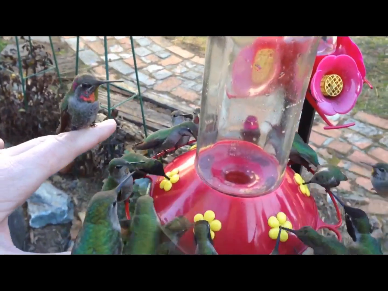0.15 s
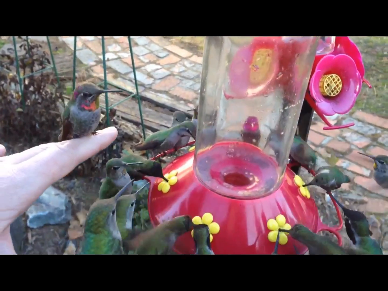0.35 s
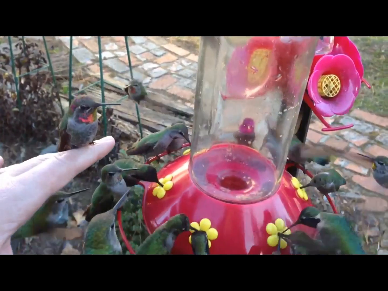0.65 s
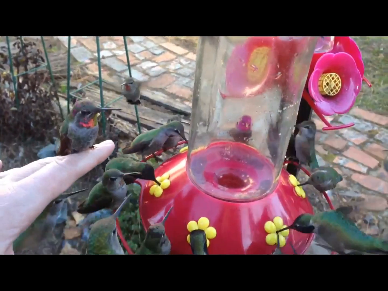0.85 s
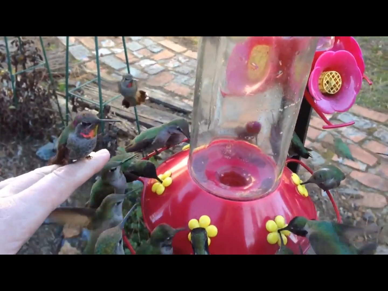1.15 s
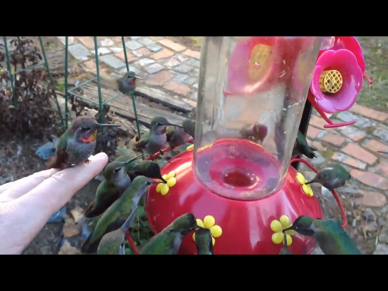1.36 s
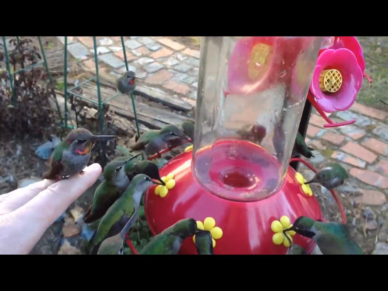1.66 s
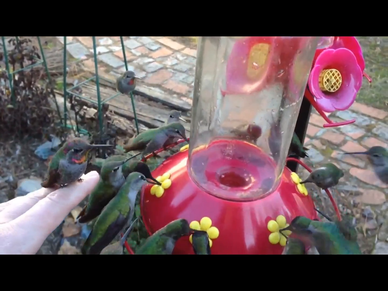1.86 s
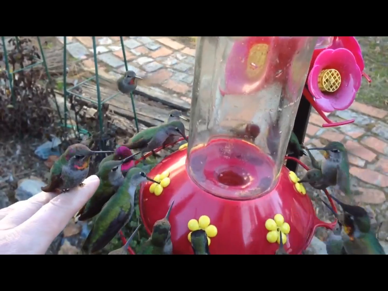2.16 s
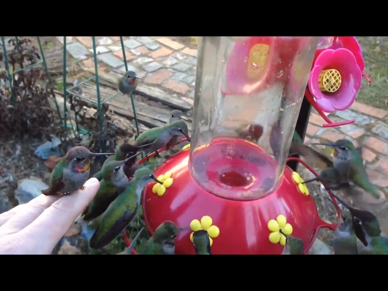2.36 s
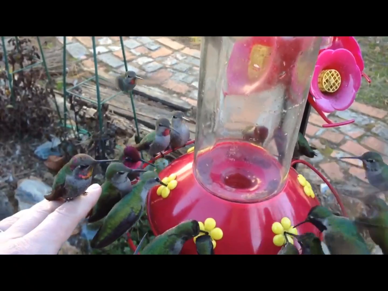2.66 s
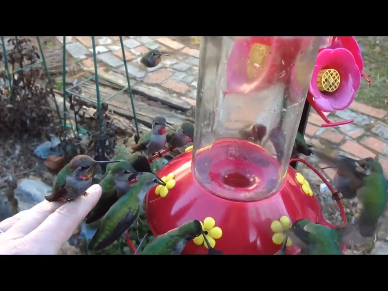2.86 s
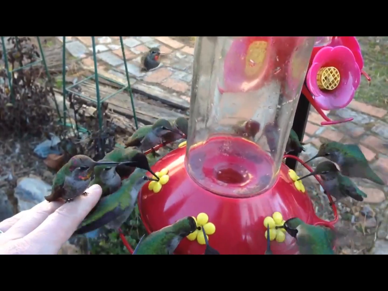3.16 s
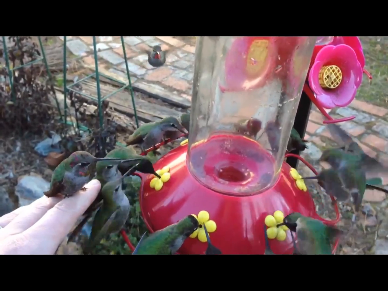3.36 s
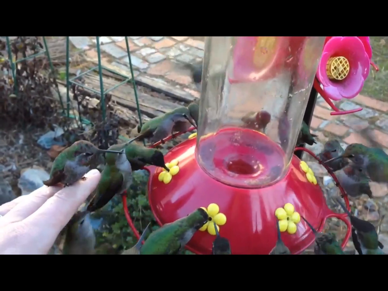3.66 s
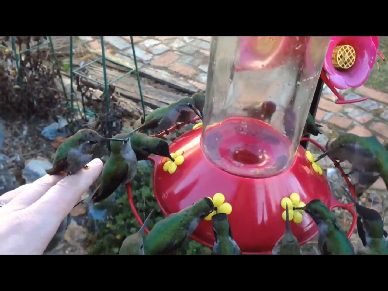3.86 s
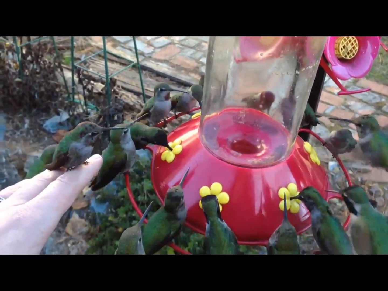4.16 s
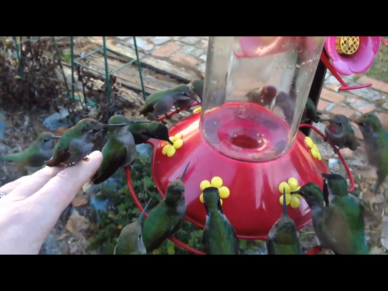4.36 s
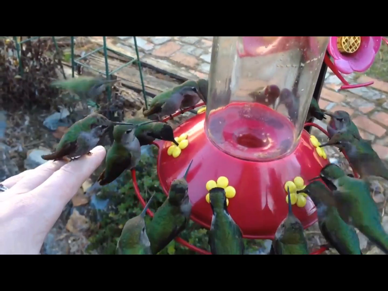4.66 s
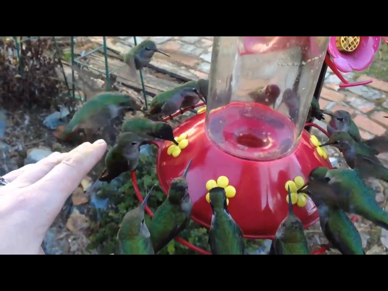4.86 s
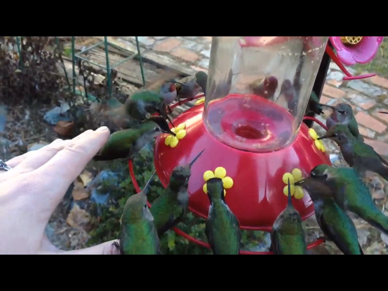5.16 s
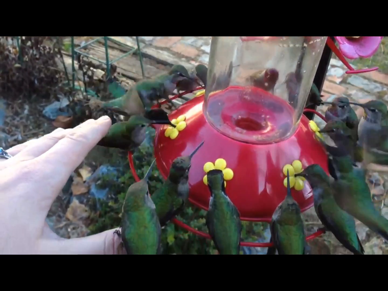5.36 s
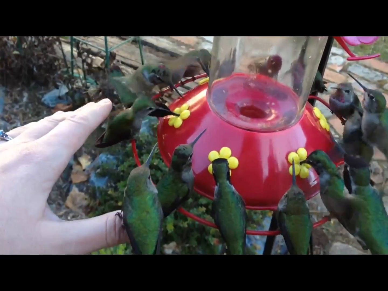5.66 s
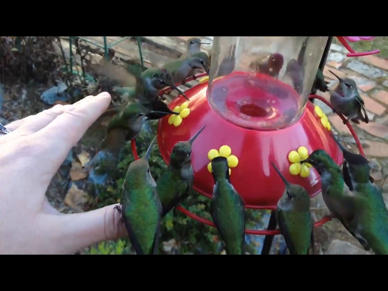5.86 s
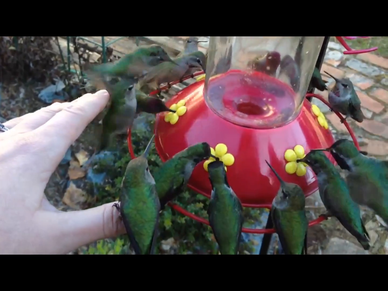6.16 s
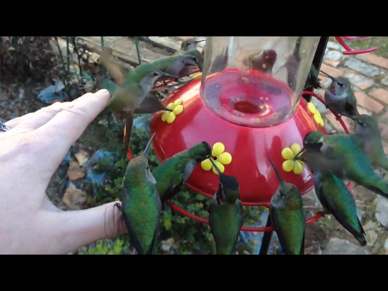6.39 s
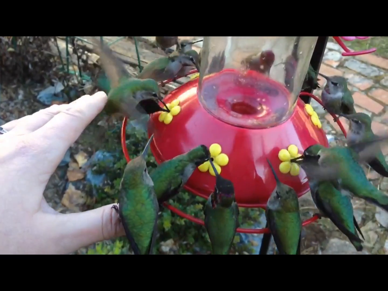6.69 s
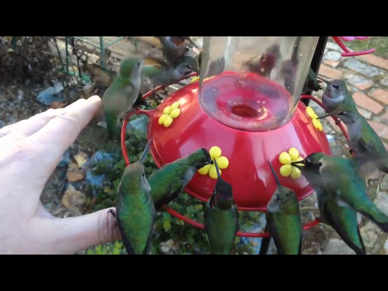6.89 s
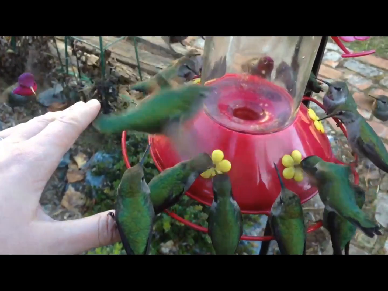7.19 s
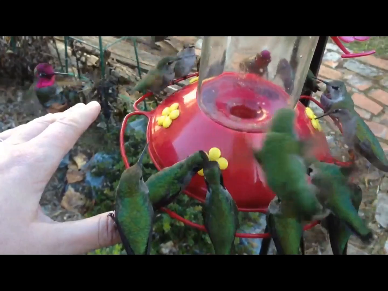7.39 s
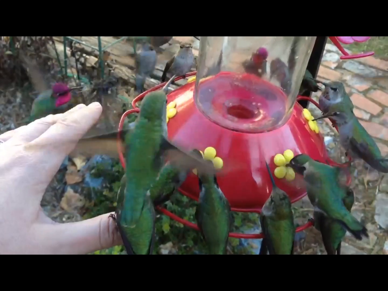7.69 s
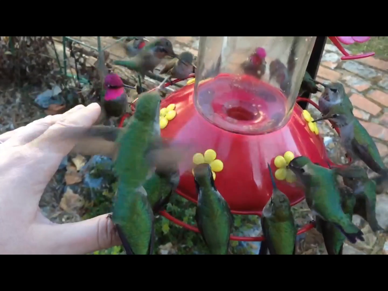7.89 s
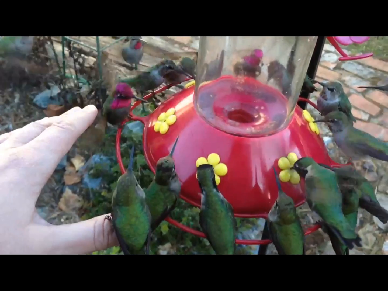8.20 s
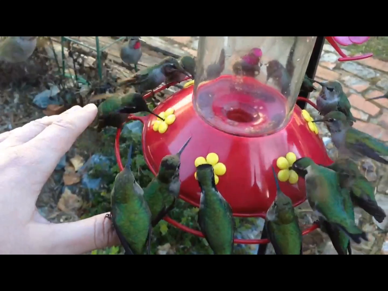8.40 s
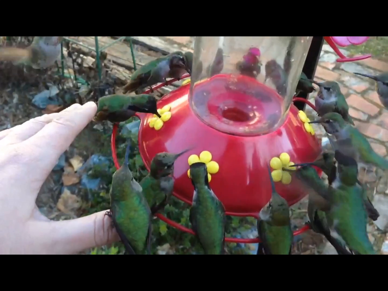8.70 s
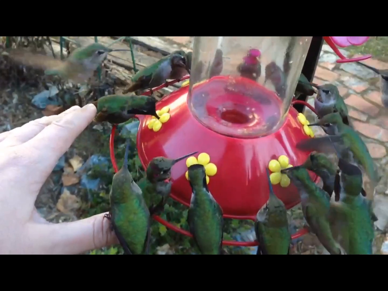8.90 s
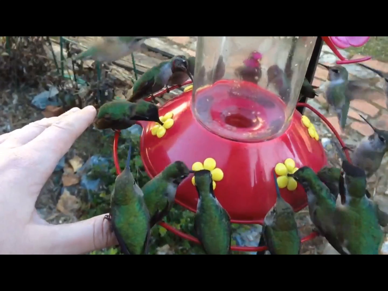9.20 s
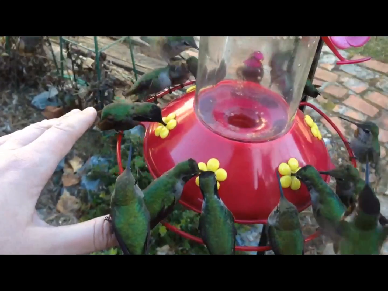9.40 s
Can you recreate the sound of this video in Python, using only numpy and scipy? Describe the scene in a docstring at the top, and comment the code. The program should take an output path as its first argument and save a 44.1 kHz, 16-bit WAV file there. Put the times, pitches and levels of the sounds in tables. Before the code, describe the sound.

A swelling low hum of many hummingbird wings, with feathery swishes, sharp little wing slaps and high squeaky chips outdoors.

```python
"""Hummingbirds hover round a garden feeder, an arm's length from a small microphone. From the start,
over outdoor hiss, wings beat near 50 times a second and hum on its multiples; feathers swish on each
beat and now and then slap. Quick falling chips join at 1.4 s. Around 3 s the birds jostle close by and
one squeaks a thin whistle. The hum swells highest at 7.4 s; raspy scolding and peeps follow, then a
wavering whine from 8.4 s and a few last chips."""
import sys
import numpy as np
from scipy import signal
from scipy.fft import rfft, irfft
from scipy.io import wavfile
from scipy.ndimage import uniform_filter1d

SR = 44100
rng = np.random.default_rng(int(sys.argv[2]) if len(sys.argv) > 2 else 0)


def master(y):
    """Save y as 16-bit WAV."""
    cut = np.clip(np.atleast_2d(y).T, -1, 1)
    pcm = np.round(cut * 32767)  # scale
    wavfile.write(sys.argv[1], SR, pcm.astype(np.int16))


N = 420713
COARSE = 8  # the hum is all bass, so it is built on every 8th sample


def undb(db):
    """Decibels to gain."""
    return 10 ** (np.asarray(db) / 20)


def unit(x):
    """Scales x to rms 1."""
    return x / np.sqrt(np.mean(x ** 2))


def equalise(x, curve):
    """Shapes x with an EQ curve of (f/Hz, gain/dB) points."""
    hz, db = np.transpose(curve)
    f = np.maximum(np.arange(N // 2 + 1) * SR / N, 1)
    return irfft(rfft(x) * undb(np.interp(np.log(f), np.log(hz), db)), N)


def drift(rate, size=N // COARSE + 1):
    """A random modulator of rms 1 across the scene: ramps between rate points a second."""
    knots = rng.standard_normal(int(N / SR * rate) + 2)
    return unit(np.interp(np.linspace(0, N / SR * rate, num=size), np.arange(len(knots)), knots))


def add(out, s, x):
    """Mixes x into out from time s."""
    i = int(s * SR)
    out[i:i + len(x)] += x[:N - i]


def humps(rows):
    """An envelope with a raised-cosine hump for each (middle/s, width at half height/s, height)."""
    out = np.zeros(N)
    for s, width, height in rows:
        angle = np.linspace(0, np.pi, int(2 * width * SR))
        cut = max(int((width - s) * SR), 0)
        add(out, max(s - width, 0), height * np.sin(angle[cut:]) ** 2)
    return out


# EQ of the outdoor bed: f/Hz, gain/dB
AIR_EQ = [(30, 10), (100, 34), (300, 3.5), (600, 4.5), (1000, 4), (3000, -1.5), (8000, -1), (15000, -0.5)]


def outdoor_air(level_db=-53, drift_db=.6):
    """A bed of hiss and low rumble whose level drifts slightly."""
    bed = unit(equalise(rng.standard_normal(N), AIR_EQ))
    return bed * undb(level_db) * undb(drift_db * drift(4, N))


# scolding cues: t/s, length/s, centre f/Hz, bandwidth/Hz, level/dB
RASPS = [(5.593, .1, 8000, 1200, -61), (8.016, 0.042, 8550, 2500, -57), (8.048, 0.028, 6000, 4000, -59),
         (8.146, 0.048, 8600, 3000, -54.5), (8.15, 0.049, 5450, 2005, -53)]


def rasps(flutter_hz=190):
    """Raspy scolding: bands of noise chopped by a fast throat flutter."""
    out = np.zeros(N)
    for s, length, hz, width_hz, db in RASPS:
        t = np.arange(0, length, 1 / SR)
        peak = signal.iirpeak(hz, hz / width_hz, fs=SR)
        band = signal.lfilter(*peak, signal.lfilter(*peak, rng.standard_normal(len(t))))
        flutter = 1 + .4 * np.sin(2 * np.pi * flutter_hz * t)
        add(out, s, undb(db) * unit(band * flutter) * signal.windows.tukey(len(t), .4))
    return out


def whistle(contours, wobble, grit):
    """Near-sine voices, shaky in pitch and level, from (t/s, f/Hz, level/dB[, octave/dB]) points."""
    out = np.zeros(N)
    for contour in contours:
        s, hz, *levels = np.transpose(contour)
        t = np.arange(s[0], s[-1], 1 / SR)
        shake, rough = uniform_filter1d(rng.standard_normal((2, len(t))), size=120) * np.sqrt(120)
        phase = 2 * np.pi * np.cumsum(np.interp(t, s, hz) * (1 + wobble * shake)) / SR
        voice = sum(np.interp(t, s, undb(db)) * np.sin(k * phase) for k, db in enumerate(levels, 1))
        add(out, s[0], np.sqrt(2) * voice * (1 + grit * rough) * signal.windows.tukey(len(t), .1))
    return out


# whine breakpoints, one list a phrase: t/s, f/Hz, level/dB
WHINE_PHRASES = [
    [(8.4, 4630, -51), (8.42, 5116, -57), (8.446, 5110, -56), (8.5, 4720, -55.5), (8.6, 4665, -53.5),
     (8.615, 4648, -64)],
    [(8.625, 4250, -53), (8.68, 4440, -54), (8.725, 4600, -58)],
    [(8.74, 4665, -54), (8.82, 4900, -62), (8.85, 4340, -55)],
]


def whine(octave_db=-9):
    """A long, grainy, wavering call that breaks twice."""
    contours = [[(s, hz, db, db + octave_db) for s, hz, db in phrase] for phrase in WHINE_PHRASES]
    return whistle(contours, wobble=.012, grit=.3)


# peep cues: t/s, length/s, start f/Hz, end f/Hz, top level/dB
PEEPS = [(4.409, 0.024, 11510, 11240, -47), (4.458, 0.022, 9150, 9500, -47), (5.6, 0.061, 7400, 7300, -65),
         (7.159, 0.058, 9300, 9500, -51), (7.996, .029, 9550, 8750, -50), (8.044, 0.035, 8400, 9280, -46),
         (8.135, .013, 9440, 9100, -48), (9, .07, 4696, 5840, -62), (9.294, 0.036, 4596, 4340, -50.5)]


def peeps():
    """Short grainy glides, loudest a third of the way in."""
    contours = [[(s, start_hz, db - 8),
                 (s + .32 * length, start_hz + .37 * (end_hz - start_hz), db),
                 (s + length, end_hz, db - 9)] for s, length, start_hz, end_hz, db in PEEPS]
    return whistle(contours, wobble=.012, grit=.3)


# squeak cues: t/s, length/s, start f/Hz, top f/Hz, climb/s, level/dB, octave level/dB
SQUEAKS = [(3.078, 0.093, 7340, 7667, 0.013, -38, -53), (6.832, 0.094, 7336, 7660, 0.035, -43, -51),
           (7.858, 0.081, 7010, 7520, 0.042, -38, -58)]


def squeaks(sag_hz_per_s=2800, fade_db=4.5):
    """Thin, clean whistles that climb, then sag and fade."""
    contours = []
    for s, length, start_hz, top_hz, climb, db, octave_db in SQUEAKS:
        sag_hz = top_hz - sag_hz_per_s * (.82 * length - climb)
        end_hz = top_hz - sag_hz_per_s * (length - climb) - 350
        contours.append([(s, start_hz, db - fade_db, octave_db - fade_db),
                         (s + climb, top_hz, db, octave_db),
                         (s + .83 * length, sag_hz, db - fade_db, octave_db - fade_db),
                         (s + length, end_hz, db - 16, octave_db - 22)])
    return whistle(contours, wobble=.003, grit=.08)


# chip cues: t/s, top f/Hz, bottom f/Hz, length/s, peak level/dB
CHIPS = [(1.444, 7840, 2300, 0.0081, -43), (1.622, 8740, 5500, 0.0075, -51.5),
         (1.726, 4280, 2750, 0.0025, -46), (1.955, 10500, 3800, .013, -55.5), (2.73, 8000, 5500, .005, -55),
         (3.822, 9500, 5770, 0.0054, -41), (4.191, 7976, 2440, 0.0057, -41.5),
         (4.737, 8610, 3000, 0.0059, -50), (4.75, 7780, 2560, 0.0088, -40),
         (5.189, 8500, 2460, 0.0059, -46), (5.434, 9600, 3326, 0.01, -46),
         (5.678, 7140, 5000, 0.0027, -40.5), (7.769, 8500, 4500, 0.0076, -40.5),
         (7.845, 7060, 4000, .005, -47), (8.145, 9100, 5300, 0.0074, -44), (8.164, 6970, 2200, 0.012, -35),
         (8.85, 4600, 3170, 0.0046, -37.5), (9.069, 5300, 2100, 0.021, -44.5),
         (9.325, 4350, 2800, 0.0071, -38)]


def chips(bend=1.8):
    """Each chip is a sine that plunges within milliseconds."""
    out = np.zeros(N)
    for s, top_hz, low_hz, length, db in CHIPS:
        progress = np.linspace(0, 1, int(length * SR))
        hz = top_hz + (low_hz - top_hz) * progress ** bend
        envelope = np.sin(np.pi * progress ** 1.33)
        add(out, s, undb(db) * envelope * np.sin(2 * np.pi * np.cumsum(hz) / SR))
    return out


def wing_hits(cues, ring_q, attack_s=.00029, crack_s=.00035, tail_db=-17, tail_s=.003):
    """A blow and a tight crack with a rustling tail, voiced as a broad ring plus a treble snap."""
    out, t = np.zeros(N), np.arange(900) / SR
    treble_band = signal.butter(1, (6000, 13500), "band", fs=SR)
    attack = 1 - np.exp(-t / attack_s)
    envelope = attack * (np.exp(-t / crack_s) + undb(tail_db) * np.exp(-t / tail_s))
    blow = .48 * np.exp(-((t - .0005) / .00006) ** 2)
    for s, ring_db, hz, snap_db in cues:
        ring_burst, snap_burst = rng.standard_normal((2, len(t))) * envelope
        ring = signal.lfilter(*signal.iirpeak(hz, ring_q, fs=SR), ring_burst + blow)
        snap = signal.lfilter(*treble_band, snap_burst)
        hit = undb(ring_db) * ring / abs(ring).max() + undb(snap_db) * snap / abs(snap).max()
        add(out, s + .0003, hit)
    return out


# runs of soft touches: first t/s, last t/s, ring peak level/dB, ring f/Hz, snap peak level/dB
BRUSHES = [(2.039, 2.136, -44.5, 1720, -45), (2.866, 2.981, -39, 1400, -40),
           (3.1457, 3.396, -43.5, 1880, -63), (5.443, 5.5136, -40.5, 1180, -45),
           (6.151, 6.2328, -41.5, 2698, -38.5), (6.8318, 6.861, -38, 1398, -37),
           (7.564, 7.623, -43, 1200, -42)]


def brushes(gap_s=.019, scatter_db=2.5, pitch_scatter=.093):
    """A wing tip brushes something once a beat, no two touches alike."""
    cues = []
    for first, last, ring_db, hz, snap_db in BRUSHES:
        times = np.linspace(first, last, num=1 + round((last - first) / gap_s))
        offsets = rng.standard_normal((32, 3)) * (scatter_db, pitch_scatter, scatter_db)
        for s, (ring_trim, detune, snap_trim) in zip(times, offsets):
            cues.append((s, ring_db + ring_trim, hz * np.exp(detune), snap_db + snap_trim))
    return wing_hits(cues, ring_q=2.2)


# slap cues: t/s, ring peak level/dB, ring f/Hz, snap peak level/dB
SLAPS = [(0.02, -27, 3080, -29), (0.2503, -30.5, 3440, -36), (0.2684, -31.5, 2640, -50),
         (0.615, -33, 3170, -40), (0.641, -23.5, 2040, -53), (0.6704, -42, 2370, -42),
         (1.1103, -28.5, 3420, -44), (1.129, -34.5, 2360, -32), (1.1684, -36.5, 1210, -38),
         (2.0577, -36, 1072, -31.5), (2.0787, -33.5, 3330, -52), (2.1137, -38, 2320, -37),
         (2.155, -23, 4252, -29), (2.3868, -31, 4385, -29), (2.5325, -28, 1630, -35),
         (2.6753, -38, 1240, -33.5), (2.6984, -35, 2185, -32), (2.7084, -26.5, 4196, -22.5),
         (2.798, -21.5, 2310, -21.5), (2.8074, -30, 2010, -28), (2.8165, -27, 2730, -37),
         (2.8335, -29, 1430, -33), (2.9447, -40, 2273, -35), (2.962, -18, 2428, -22.5),
         (2.9981, -38, 3460, -35), (3.0572, -42, 1880, -42), (3.1338, -35.5, 1150, -42),
         (3.4176, -33, 2152, -35), (3.4399, -20.5, 3634, -32), (3.459, -21, 2620, -21),
         (3.4768, -23.5, 3840, -39), (3.496, -24.5, 3780, -28), (3.5404, -33.5, 2240, -40),
         (3.6468, -39.5, 2080, -34), (4.4334, -39, 1878, -36), (4.4392, -25.5, 5420, -46),
         (4.453, -19, 3970, -45), (4.4574, -32, 2420, -44), (4.9508, -37.5, 2167, -36),
         (4.995, -25.5, 2236, -53), (5.3622, -34, 1280, -40), (5.3828, -30, 2080, -32),
         (5.696, -29.5, 2600, -36), (5.7505, -28, 4660, -58), (5.8152, -39, 4500, -47),
         (5.8614, -44, 1498, -41), (5.88, -33.5, 1388, -40), (5.8995, -33, 2404, -41),
         (5.9075, -33, 4400, -29.5), (5.9264, -25, 2620, -30), (5.943, -30, 2770, -29.5),
         (5.9647, -29.5, 2200, -31), (6.2597, -35, 3385, -38), (6.2741, -30, 2836, -42),
         (6.302, -23.5, 1710, -23), (6.342, -31, 2330, -40), (6.3854, -38, 2423, -38),
         (6.4446, -31.5, 3293, -37), (6.5191, -25.5, 2470, -21.5), (6.5234, -42, 1130, -28),
         (6.546, -28.5, 2440, -46), (6.948, -33, 3160, -35), (6.987, -27.5, 4600, -43),
         (7.005, -29, 2760, -43), (7.0219, -31, 1074, -34), (7.0386, -24, 3297, -50),
         (7.4914, -29.5, 5730, -43), (7.4972, -33, 1210, -35), (7.5832, -37, 2246, -39),
         (7.641, -34.5, 1190, -45), (8.2487, -49, 1200, -34), (8.305, -46, 1070, -37.5),
         (8.3449, -36, 1604, -38), (8.5894, -30, 4513, -48), (8.6093, -32, 4254, -34),
         (8.7214, -36, 4650, -33), (8.8, -38, 4960, -52), (8.8742, -39, 1430, -35),
         (9.0443, -38, 2550, -41), (9.069, -29.5, 2640, -37), (9.2384, -34.5, 1302, -34.5)]


def slaps():
    """Wings slap feathers and feeder: dry, sharp transients."""
    return wing_hits(SLAPS, ring_q=1.4)


# EQ of the feather noise: f/Hz, gain/dB
SWISH_EQ = [(400, 1), (700, 5), (1200, 2), (2500, 0), (5000, -4.5), (9000, -8), (15000, -10.5)]


def feather_swish(phases, level_db, sharpness=1.4, tick_db=-8, scatter_db=4, tick_s=.00083):
    """Air hisses through each bird's feathers once a beat; the tips tick twice a beat, some louder."""
    gate = sum(undb(2 * drift(5, N) + 4 * drift(40, N)) * np.exp(sharpness * (np.cos(phase) - 1))
               for phase in phases)
    hiss = unit(gate * rng.standard_normal(N))
    triggers = np.zeros(N)
    for phase in phases:
        turns = np.diff(np.floor(phase / np.pi), prepend=0) > 0
        triggers[turns] += undb(np.minimum(scatter_db * rng.exponential(size=turns.sum()), 13))
    decay = np.exp(-np.arange(300) / SR / tick_s)
    ticks = unit(signal.fftconvolve(triggers, decay)[:N] * rng.standard_normal(N))
    return unit(equalise(hiss + undb(tick_db) * ticks, SWISH_EQ)) * undb(level_db)


# timbre of a wing beat: harmonic number, gain/dB
BEAT_HARMONICS = [(1, -14.5), (2, -2.5), (3, -5.5), (4, -8.5), (5, -12.5), (6, -12.5), (7, -16.5),
                  (8, -19.5), (9, -23), (10, -25), (11, -33.5), (12, -31.5), (13, -31.5), (14, -58)]


def bird_hum(hz, tips_gain_db, jitter=.011, waver=.21):
    """One bird's hum and wing phase; strokes vary and each harmonic wavers as the body turns."""
    phase = 2 * np.pi * (np.cumsum(hz * (1 + jitter * drift(30))) * COARSE / SR + rng.random())
    tips, hum = undb(tips_gain_db), 0
    for k, db in BEAT_HARMONICS:
        # harmonic 2 is the stroke hum; all the others are the wing-tip buzz
        gain = undb(db) * (1 if k == 2 else tips) * (1 + waver * drift(12))
        hum = hum + gain * np.cos(k * phase + 1.5 * rng.random())
    return np.sqrt(2) * hum * (1 + .18 * drift(35)), phase


def flock_hum(hz, stroke_db, tips_db, detune=.09, others_db=-13, dart_db=3.5):
    """Hum and wing phases of the nearest bird and of seven detuned ones that dart in and out."""
    hz, stroke_db, tips_db = (np.append(curve, curve[-COARSE:])[::COARSE][:N // COARSE + 1]
                              for curve in (hz, stroke_db, tips_db))
    tips_gain_db = tips_db - stroke_db
    nearest, phase = bird_hum(hz, tips_gain_db)
    out, phases = nearest * undb(stroke_db), [phase]
    smooth = int(SR / COARSE / 4)  # a quarter of a second
    for side in np.linspace(-1, 1.3, num=7):
        rate_hz = uniform_filter1d(hz, 4 * smooth) * (1 + detune * (side + .5 * drift(3)))
        hum, phase = bird_hum(rate_hz, uniform_filter1d(tips_gain_db, smooth) + 5.5)
        out += hum * undb(uniform_filter1d(stroke_db, smooth) + others_db + dart_db * drift(5))
        phases.append(phase)
    full_rate_phases = [np.interp(np.arange(N) / COARSE, np.arange(len(p)), p) for p in phases]
    return signal.resample_poly(out, COARSE, 1)[:N], full_rate_phases


# flock automation: t/s, beat f/Hz, base wing-tip level/dB, base swish level/dB
WING_AUTOMATION = [(0.0, 46.75, -46, -58.5), (0.7, 47.27, -43, -57), (0.95, 48.9, -43, -58.5),
                   (1.4, 47.6, -44.5, -60.5), (1.9, 48.5, -49, -65), (2.2, 53.1, -47.5, -63.5),
                   (2.4, 48.73, -47.5, -59.5), (2.75, 48.83, -45, -58.5), (2.95, 52.97, -46, -58.5),
                   (3.5, 53.29, -49, -61.5), (3.85, 49.19, -44, -60), (4.4, 49.96, -42, -58.5),
                   (4.799, 49.2, -45, -59.5), (5.25, 50.77, -42.5, -59), (6.4, 50.08, -43.5, -56.5),
                   (6.65, 48.52, -43.5, -60.5), (6.85, 50.17, -44, -55.5), (7.45, 49.96, -39, -53.5),
                   (7.599, 47.5, -41.5, -53), (7.87, 51, -40.5, -55), (8.45, 50.27, -45.5, -58),
                   (8.65, 52.68, -43, -54.5), (8.82, 49.04, -43, -56), (9.54, 48.62, -39.5, -55)]
# stroke hum swells, as when neighbouring wings beat in step: middle t/s, width/s, level/dB
SWELLS = [(0.08, 0.081, -45), (0.27, 0.061, -39), (0.502, 0.13, -43), (0.842, 0.2, -40.5),
          (1.172, 0.18, -38.5), (1.55, 0.19, -43), (1.77, .06, -46), (1.93, 0.053, -47), (2.03, .04, -46),
          (2.2, 0.084, -42), (2.37, 0.046, -48), (2.53, 0.1, -44.5), (2.71, 0.061, -38),
          (2.84, 0.069, -33.5), (2.97, .06, -37.5), (3.25, .23, -40), (3.52, .09, -36.5),
          (3.96, 0.28, -37.5), (4.2, 0.057, -34), (4.3, .045, -43), (4.46, 0.093, -37.5),
          (4.64, 0.068, -47), (4.8, 0.078, -39.5), (5.04, 0.071, -42), (5.24, 0.058, -50),
          (5.55, 0.22, -41), (5.83, .13, -38.5), (6.03, 0.05, -34), (6.27, 0.15, -42), (6.53, 0.11, -34.5),
          (6.74, 0.036, -49), (6.88, .14, -43.5), (7.13, 0.12, -39), (7.38, 0.071, -29.5), (7.54, .08, -34),
          (7.68, 0.097, -38), (7.86, 0.083, -34), (8.03, 0.057, -36), (8.38, 0.22, -42), (8.7, 0.089, -33),
          (8.84, .07, -42), (9.04, 0.19, -41), (9.4, .14, -37)]
# birds jostle close by, lifting tips and feathers: middle t/s, width/s, boost/dB
JOSTLES = [(0.28, 0.052, 4), (0.95, 0.065, 4), (1.12, 0.097, 3), (2.2, 0.1, 6), (2.53, 0.091, 4.5),
           (2.84, 0.21, 9.5), (3.48, 0.15, 11), (4.2, 0.11, 3.5), (4.44, 0.051, 4), (5.4, 0.12, 2.5),
           (5.95, 0.21, 4), (6.29, 0.21, 6.5), (6.52, 0.13, 4.5), (7.0, 0.22, 2), (8.67, .16, 6)]


def wings(floor_db=-49.5, tip_share=.69):
    """Beating wings: hum and swish locked in rhythm, riding the swells and jostles."""
    s, *lanes = np.transpose(WING_AUTOMATION)
    hz, tips_db, swish_db = (np.interp(np.arange(N) / SR, s, lane) for lane in lanes)
    swell = humps([(middle, width, undb(db)) for middle, width, db in SWELLS])
    stroke_db = 20 * np.log10(swell + undb(floor_db))
    jostle_db = humps(JOSTLES)
    hum, phases = flock_hum(hz, stroke_db, tips_db + tip_share * jostle_db)
    return hum + feather_swish(phases, swish_db + jostle_db)


def scene():
    """The mono mix: wings up front, then voices and the outdoor bed."""
    flight = wings() + slaps() + brushes()
    voices = chips() + squeaks() + peeps() + whine() + rasps()
    return (flight + voices + outdoor_air())[None]


def record(dry):
    """The recorder drops the deepest bass and cuts the top."""
    low_cut = signal.butter(2, 30, "high", fs=SR, output="sos")
    high_cut = signal.ellip(10, .2, 70, 15300, fs=SR, output="sos")
    return signal.sosfilt(high_cut, signal.sosfilt(low_cut, dry))


dry = scene()
out = record(dry)
master(out)
```